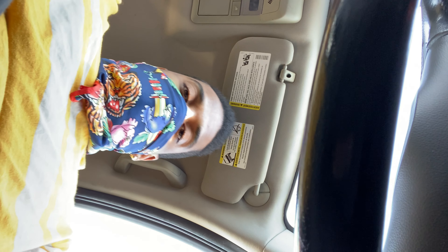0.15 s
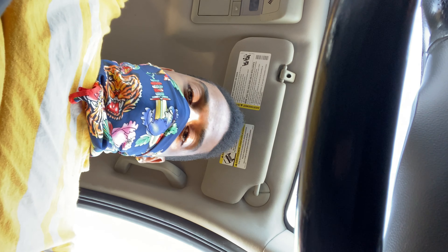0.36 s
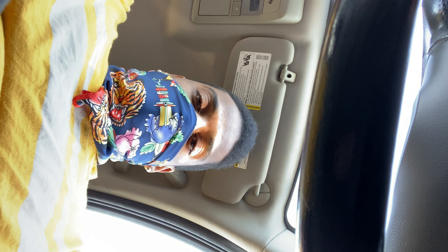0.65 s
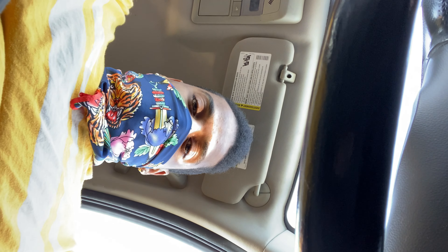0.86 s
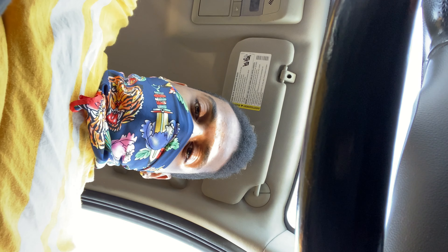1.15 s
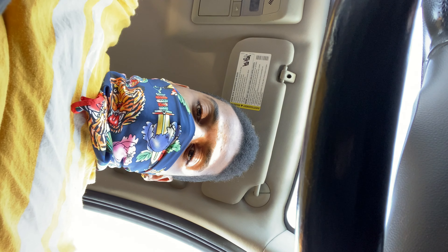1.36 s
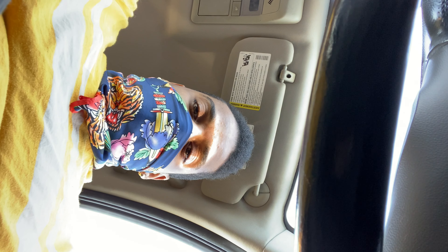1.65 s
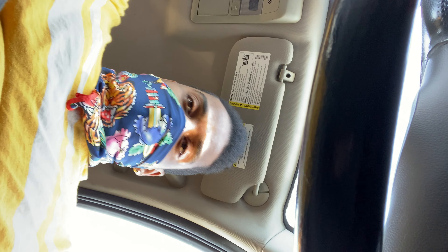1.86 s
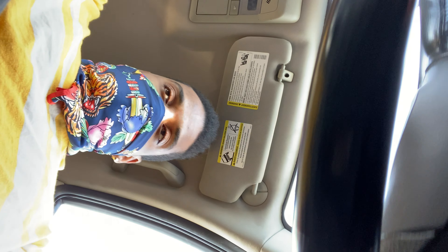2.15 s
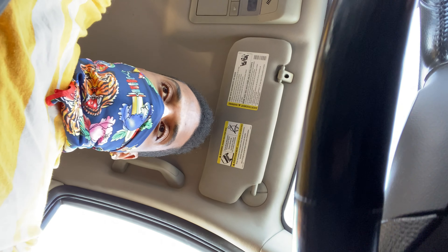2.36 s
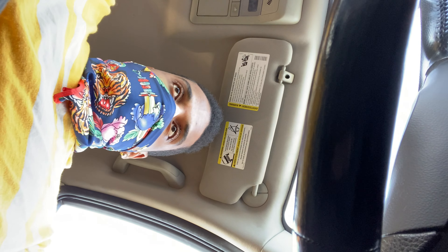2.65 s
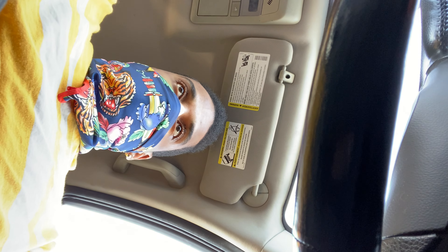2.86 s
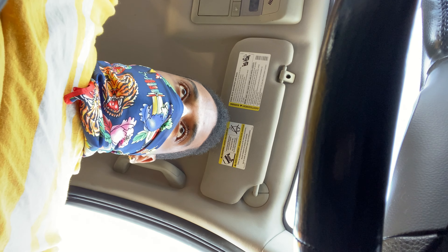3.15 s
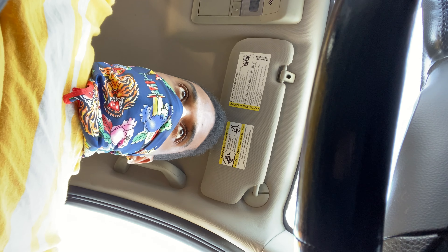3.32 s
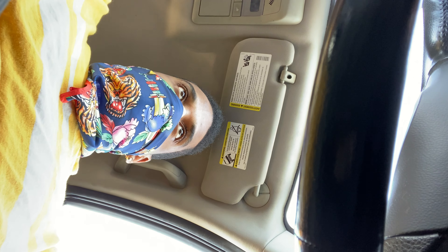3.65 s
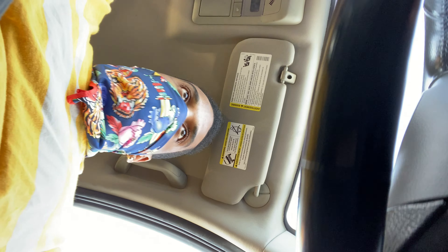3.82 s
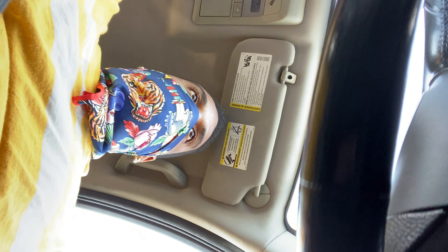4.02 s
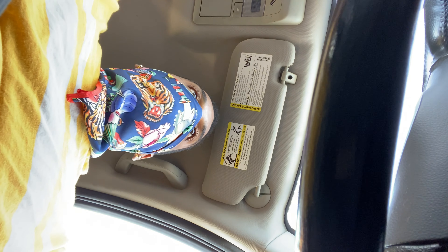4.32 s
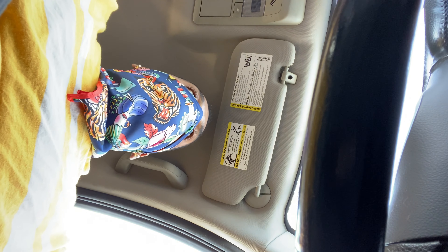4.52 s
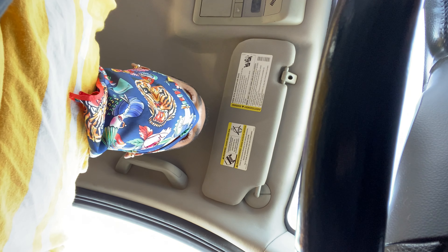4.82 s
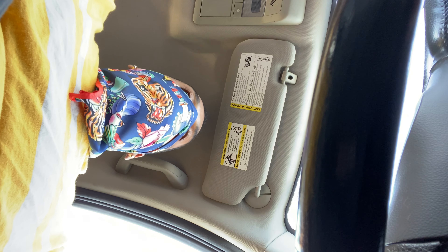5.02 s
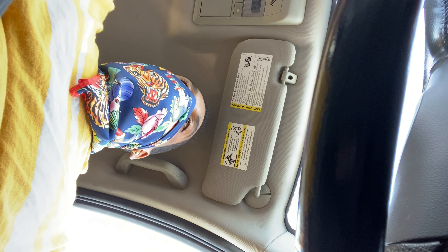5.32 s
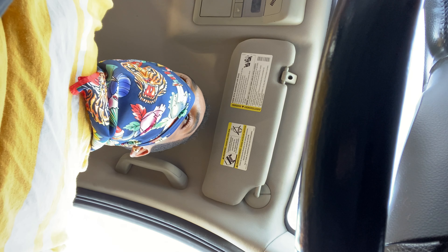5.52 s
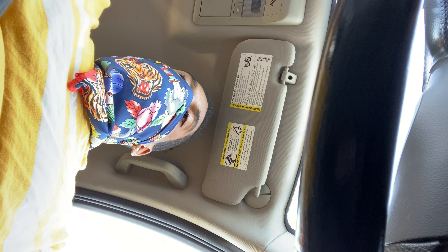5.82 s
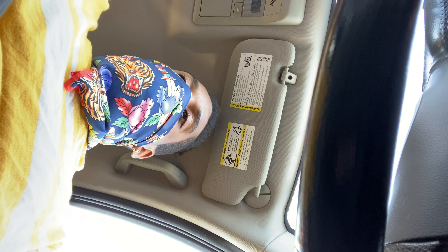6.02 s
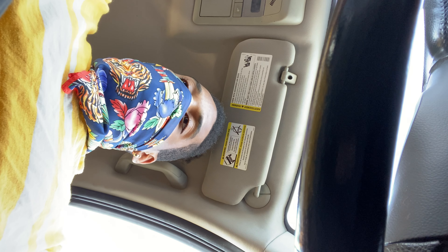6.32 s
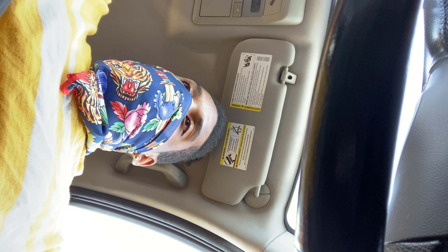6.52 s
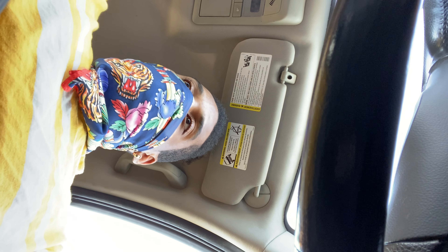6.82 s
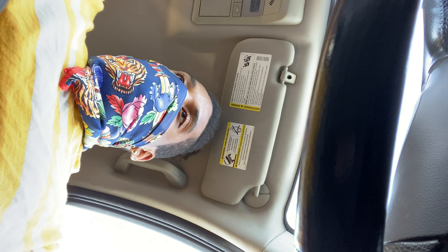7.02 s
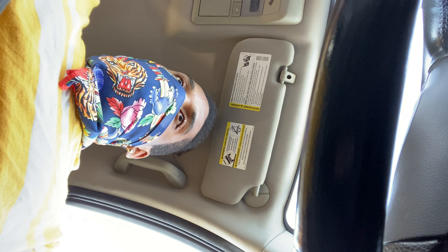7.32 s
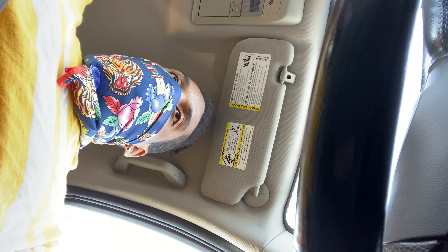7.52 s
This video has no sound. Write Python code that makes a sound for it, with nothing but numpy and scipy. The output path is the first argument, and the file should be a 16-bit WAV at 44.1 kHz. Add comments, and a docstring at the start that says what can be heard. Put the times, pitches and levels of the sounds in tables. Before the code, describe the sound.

Close up in a car cabin, keys clack against each other and the trim, with brief metallic rings, grainy scrapes and occasional dull hand bumps. A few sharp clacks come first, then scattered small clicks and rattles, and finally a louder flurry. Underneath, muffled traffic rumbles steadily outside, along with a faint engine that slows to an idle.

```python
"""Keys scrape and clack as a hand moves them about in a parked car, over a low rumble from outside.
Sliding keys make a grainy hiss. Each knock on other keys or on the car's trim is a burst of tiny
contacts that sets keys and trim ringing briefly. Now and then a loose piece rings on, or the hand
thuds on the trim. Traffic, a slowing engine and two faint hums come through the body of the car.
The cabin adds a short echo, and everything is heard close up, in stereo."""
import sys
import numpy as np
from scipy import signal
from scipy.fft import rfft, irfft, next_fast_len
from scipy.io import wavfile
from scipy.ndimage import map_coordinates

SR = 44100
rng = np.random.default_rng(int(sys.argv[2]) if len(sys.argv) > 2 else 0)


def master_out(mix):
    """Clip the mix to full scale and print it as 16-bit PCM to the path in sys.argv[1]."""
    frames = np.transpose(np.atleast_2d(mix))
    ceiling = np.clip(frames, -1, 1)
    pcm = np.round(ceiling * 32767).astype(np.int16)
    wavfile.write(sys.argv[1], SR, pcm)


N = 338247

# How loudly keys and fingers slide: t/s, key blade level/dB, trim level/dB
SCRAPE_LEVELS = [(0.0, -45, -48.5), (0.2, -44.5, -46), (0.33, -38.5, -45), (0.42, -44, -42),
                 (0.47, -55, -58), (0.56, -58.5, -68.5), (0.77, -66, -53.5), (1.05, -63, -57),
                 (1.43, -65, -59), (1.58, -76.5, -73.5), (1.79, -66.5, -49), (1.9, -62.5, -55.5),
                 (2.76, -69.5, -54.5), (3.14, -59, -59), (3.31, -76.5, -72), (3.57, -86, -64),
                 (3.69, -69.5, -56.5), (4.21, -70.5, -63), (5.0, -80, -62), (5.28, -56.5, -65.5),
                 (5.49, -83, -68), (6.15, -77, -61.5), (6.47, -75, -69), (6.62, -68.5, -50),
                 (6.84, -49.5, -38.5), (6.99, -65.5, -51.5), (7.18, -56.5, -58.5), (7.43, -77, -63.5),
                 (7.67, -85.5, -69.5)]
# Tone colour of the rubbed trim, the steel blades and their thin edges: f/Hz, relative level/dB
TRIM_COLOUR = [(250, -15), (450, 1), (800, -1.5), (1300, -15.5), (2500, -37.5), (5000, -54)]
BLADE_COLOUR = [(600, -41.5), (1250, -3), (1600, -2), (2050, -3), (2600, -2.5), (3300, -5), (6000, -14),
                (9000, -45.5)]
EDGE_COLOUR = [(3000, -45), (6000, -11.5), (9000, 6), (11000, -3), (13000, 1.5), (14500, -9.5),
               (16000, -22)]
# How loud the traffic is: t/s, boom level/dB, drone level/dB
TRAFFIC_LEVELS = [(0.0, -52.5, -43.5), (0.34, -47.5, -46.5), (2.11, -37.5, -46), (2.43, -44, -46),
                  (4.44, -40, -46.5), (5.64, -46, -47.5), (6.49, -46.5, -44.5), (7.37, -37.5, -46.5),
                  (7.67, -41, -51)]
# Tone colour of the deep boom and the higher drone: f/Hz, relative level/dB
BOOM_COLOUR = [(10, -120), (22, -48.5), (30, -14.5), (38, -1.5), (55, 4), (75, -3.5), (100, -7),
               (130, -14.5), (200, -38.5), (400, -120)]
DRONE_COLOUR = [(53, -23.5), (90, -7.5), (114, -13), (136, -14.5), (215, -16.5), (279, -29), (336, -24),
                (565, -37), (613, -59), (1500, -81), (1950, -99), (3300, -120)]
# A faint low hum that swells near the end: t/s, level/dB
LOW_HUM_LEVELS = [(0, -71.5), (5, -63.5), (7.0, -49), (7.3, -45), (7.67, -47)]

# Knocks: t/s, base level/dB, hollowness/dB (on trim rather than steel), brightness/dB (thin edges
# touching), base t60/s, clearest pitch f/Hz. A t60 is the time a sound takes to fade by 60 dB.
KNOCKS = [(0.038, -41, 3.5, -8.5, 0.057, 1635), (0.091, -46.5, 4.5, -8.5, 0.074, 1686),
          (0.151, -53, -13, 0.5, 0.084, 2690), (0.173, -50, 1, 7, 0.084, 1854),
          (0.226, -41, 5.5, -7, 0.065, 2047), (0.271, -45, 6.5, -2.5, 0.1, 1698),
          (0.295, -41, -1, -15, 0.14, 1120), (0.377, -45, 8.5, -10.5, 0.069, 1730),
          (0.426, -47, 11, -10, 0.085, 1080), (0.489, -40, 1.5, -6.5, 0.073, 1066),
          (0.511, -24, -7.5, -14.5, 0.045, 1620), (0.582, -64.5, 3.5, 15, 0.044, 2540),
          (0.606, -63.5, -2.5, 12, 0.074, 1460), (0.627, -66, -3, 10, 0.04, 4500),
          (0.692, -52.5, -4, 4.5, 0.032, 1354), (0.798, -51, -7.5, 4, 0.091, 4130),
          (0.841, -64.5, 0, 5, 0.04, 4000), (0.863, -55.5, 13.5, -3.5, 0.095, 1880),
          (0.905, -66, 20.5, 11.5, 0.037, 1317), (0.944, -66, 6, -27, 0.06, 1260),
          (0.964, -61, 2.5, -21, 0.06, 1690), (0.99, -59, 22, -9.5, 0.047, 1265),
          (1.055, -54, 13.5, -5, 0.088, 1910), (1.078, -34.5, -2, -8.5, 0.066, 1662),
          (1.113, -62, 0, 6.5, 0.03, 3000), (1.124, -60.5, 4.5, 7, 0.06, 950),
          (1.148, -59, 8, -10, 0.053, 1585), (1.194, -48.5, -0.5, 0, 0.04, 1483),
          (1.198, -34, 6.5, 6.5, 0.053, 1024), (1.272, -60, -2, 5.5, 0.06, 1610),
          (1.294, -60.5, 0.5, 8.5, 0.051, 940), (1.334, -64.5, -7, 7.5, 0.035, 2950),
          (1.383, -65, 16.5, -12, 0.067, 2040), (1.447, -57, 8, 3, 0.06, 5340),
          (1.466, -56.5, -2.5, 12, 0.05, 1470), (1.488, -54, 4.5, 2, 0.078, 1514),
          (1.508, -30.5, 1, 8.5, 0.057, 3570), (1.544, -51, -8.5, 10.5, 0.06, 1494),
          (1.603, -61, 3.5, 9, 0.045, 2760), (1.796, -44, 14.5, -27.5, 0.052, 1084),
          (1.818, -50.5, -3, 0, 0.079, 5330), (1.843, -40, 1, -10, 0.057, 1700),
          (1.848, -22.5, -2, -12, 0.065, 1547), (1.888, -59.5, 3, 6, 0.045, 2300),
          (1.902, -58.5, 2.5, 8, 0.088, 1598), (1.917, -50, -2, -2.5, 0.051, 1330),
          (1.951, -54, 0, 10, 0.068, 1500), (2.045, -63, 17, 2, 0.091, 1135),
          (2.078, -57.5, 0, 1, 0.051, 1333), (2.096, -33, -12, -10, 0.032, 2367),
          (2.171, -74.5, 5, 3, 0.048, 1140), (2.213, -65.5, 0, 4.5, 0.054, 2500),
          (2.267, -62.5, 12, -17, 0.055, 1970), (2.287, -39.5, 8.5, -22.5, 0.046, 1659),
          (2.386, -59, 19.5, -11.5, 0.06, 993), (2.441, -60, 4, -8, 0.13, 1680),
          (2.468, -62, 11.5, -6, 0.061, 1100), (2.651, -58.5, -4, 0, 0.067, 1602),
          (2.679, -66, 12.5, -7, 0.23, 1760), (2.711, -59.5, 10.5, -14.5, 0.14, 1610),
          (2.739, -47, 5.5, -3.5, 0.062, 1178), (2.772, -68.5, 11, -24, 0.06, 1296),
          (2.813, -65, 4.5, -3, 0.06, 1850), (2.864, -55.5, -2, -7, 0.05, 1482),
          (2.899, -55, -4.5, -8.5, 0.059, 1222), (2.925, -57, 9, -9, 0.098, 1886),
          (2.987, -43, -5.5, -23, 0.047, 2100), (3.001, -46, 4, -7, 0.046, 3850),
          (3.012, -45.5, 2, -2, 0.067, 2300), (3.022, -35, 2.5, -10, 0.056, 874),
          (3.055, -65.5, 10, 7, 0.051, 1547), (3.077, -54.5, 5, -0.5, 0.03, 1900),
          (3.081, -47.5, 1, 8, 0.048, 2775), (3.104, -50.5, -9.5, -7, 0.049, 2440),
          (3.109, -49.5, -9.5, -10, 0.024, 2005), (3.116, -38, -5.5, -18, 0.04, 2500),
          (3.126, -39.5, 6.5, -20, 0.045, 1400), (3.135, -37, 2, -29, 0.036, 2130),
          (3.156, -47.5, -13, 8.5, 0.06, 2600), (3.164, -38.5, -16.5, 3.5, 0.058, 2440),
          (3.174, -39, -10, 2, 0.036, 2200), (3.18, -45, 7.5, -3.5, 0.04, 1514),
          (3.184, -36.5, -0.5, -6, 0.04, 1928), (3.195, -50, -6, 9, 0.05, 1243),
          (3.205, -45.5, -1, 2.5, 0.04, 2100), (3.225, -38, 4, -17.5, 0.04, 1850),
          (3.237, -38.5, 0.5, 6, 0.04, 1049), (3.239, -34.5, 1.5, -13.5, 0.033, 1954),
          (3.247, -49.5, -9.5, 6, 0.037, 6600), (3.277, -63, -6, 6.5, 0.066, 6350),
          (3.306, -54, -1.5, -10.5, 0.06, 2280), (3.49, -75, 6, 0.5, 0.068, 1910),
          (3.543, -64, 17.5, -18, 0.049, 901), (3.555, -50, 6, -12, 0.11, 2633),
          (3.584, -56.5, 2, 0.5, 0.13, 3415), (3.613, -59.5, 8, 6.5, 0.066, 1162),
          (3.629, -34, 0.5, -30.5, 0.031, 1702), (3.646, -54.5, 0.5, 5.5, 0.14, 3330),
          (3.698, -61.5, 13, -13, 0.055, 1036), (3.72, -56, 2, -12, 0.036, 1457),
          (3.772, -61.5, 16, -4.5, 0.08, 1007), (3.929, -47, 1.5, -6, 0.053, 2167),
          (3.946, -45, -23, 0, 0.043, 3606), (3.975, -52, -14.5, -1.5, 0.044, 2200),
          (3.999, -55.5, -9, 11, 0.034, 1700), (4.007, -52, -10, 4, 0.04, 4510),
          (4.037, -57.5, 0, -12, 0.035, 1996), (4.047, -35.5, 3.5, -17.5, 0.024, 1841),
          (4.06, -55.5, 7.5, -27, 0.026, 1600), (4.178, -41.5, -16.5, -2.5, 0.041, 4304),
          (4.206, -50.5, -3, -20, 0.04, 2500), (4.217, -36, -9.5, -21.5, 0.04, 2323),
          (4.224, -46, -4.5, -21, 0.07, 1940), (4.246, -55, -4, -4, 0.04, 2570),
          (4.278, -57, -6, 6, 0.03, 5140), (4.283, -62, -4, 10, 0.06, 4350),
          (4.302, -47.5, -8.5, 9.5, 0.038, 1460), (4.35, -63.5, -1.5, -12, 0.06, 3920),
          (4.383, -66.5, 19, 7.5, 0.09, 4500), (4.485, -55, 15.5, -24.5, 0.046, 955),
          (4.501, -57, 5.5, -9.5, 0.06, 1900), (4.507, -53, 10.5, -8.5, 0.07, 2084),
          (4.52, -55, 11.5, -11, 0.054, 916), (4.533, -56.5, 1, 5, 0.04, 3990),
          (4.555, -57, -4, 12, 0.03, 4070), (4.562, -57, -7, 1, 0.048, 3970),
          (4.581, -53.5, -3, -1, 0.03, 2400), (4.589, -41, -14.5, 7.5, 0.021, 5200),
          (4.596, -46.5, -14.5, 7, 0.06, 4800), (4.629, -62, -2, 0, 0.06, 3730),
          (4.701, -58, 19.5, -14, 0.037, 904), (4.708, -60, 3, -4.5, 0.12, 3360),
          (4.803, -68.5, 8.5, -4, 0.06, 970), (4.905, -61, 9, -15, 0.06, 1913),
          (5.018, -74.5, 11, -14, 0.041, 1920), (5.075, -76, 20.5, -12, 0.07, 895),
          (5.097, -43.5, 0.5, -7, 0.077, 1705), (5.178, -37.5, -6, -10.5, 0.04, 2444),
          (5.189, -48, 4, -8, 0.05, 1554), (5.224, -49.5, -5, 9, 0.039, 4024),
          (5.246, -60.5, -4, -20.5, 0.04, 2007), (5.258, -37.5, -10, 4.5, 0.04, 5420),
          (5.273, -52, -13.5, 14, 0.03, 12720), (5.279, -50, -10, 12.5, 0.03, 1930),
          (5.283, -37, -13, 15.5, 0.025, 5220), (5.336, -45.5, -13.5, 4, 0.045, 2530),
          (5.35, -51.5, -12, 8.5, 0.025, 2160), (5.36, -46.5, 14.5, -23, 0.037, 709),
          (5.372, -62.5, 9, 9, 0.072, 1075), (5.479, -52.5, -17, 7.5, 0.06, 3995),
          (5.689, -57.5, 18.5, -10.5, 0.14, 2685), (5.726, -54, 1.5, -0.5, 0.077, 1516),
          (5.749, -36.5, 1.5, 7, 0.03, 1060), (5.764, -51, 9.5, 1, 0.04, 2540),
          (5.778, -46, 11, 4.5, 0.034, 934), (5.789, -55.5, 15.5, -13.5, 0.079, 1372),
          (5.839, -73.5, 20, 11, 0.045, 3700), (6.027, -68, 1.5, -17, 0.082, 1600),
          (6.08, -77.5, 13.5, -1, 0.055, 2920), (6.178, -49.5, 14.5, -13.5, 0.063, 1123),
          (6.235, -67.5, -0.5, 11, 0.06, 1720), (6.259, -72, 3, 13.5, 0.068, 4000),
          (6.343, -56.5, -2.5, 0, 0.046, 4080), (6.37, -67.5, 1.5, 5, 0.067, 4200),
          (6.42, -56, 19.5, -31, 0.034, 895), (6.437, -61, 7, -10, 0.078, 1136),
          (6.443, -49.5, 4.5, -9.5, 0.1, 2200), (6.468, -56.5, 6, 3, 0.044, 2600),
          (6.476, -45, 4.5, 7.5, 0.032, 5220), (6.489, -45, 5.5, 5.5, 0.08, 5360),
          (6.519, -56.5, 13, -17.5, 0.036, 1109), (6.529, -49.5, 11, 4, 0.065, 1032),
          (6.579, -49.5, 21, -14, 0.021, 889), (6.613, -75, 12.5, -12, 0.037, 1524),
          (6.635, -43.5, 14, -7.5, 0.032, 737), (6.656, -60, 11.5, -9.5, 0.04, 810),
          (6.668, -55, 6.5, 0.5, 0.07, 1283), (6.678, -49.5, 15.5, 3.5, 0.04, 750),
          (6.691, -39, 4, 5, 0.059, 1735), (6.718, -60.5, 20.5, -16, 0.06, 499),
          (6.752, -41, 2, -14.5, 0.06, 1904), (6.763, -44, 1.5, -15, 0.054, 1920),
          (6.776, -39.5, 1.5, -4, 0.05, 2294), (6.804, -42.5, 1, -14, 0.06, 1670),
          (6.815, -28.5, -6.5, 7, 0.063, 7230), (6.824, -33, 1.5, -10.5, 0.05, 1717),
          (6.849, -40, 4.5, -25.5, 0.064, 1825), (6.86, -45, 2, -23.5, 0.046, 2124),
          (6.89, -35, 0, -8.5, 0.054, 3307), (6.917, -55, 7, -25, 0.093, 1520),
          (6.941, -49, 5, -28, 0.05, 1828), (6.951, -50, 4.5, -28, 0.038, 1904),
          (6.961, -45.5, 4.5, -26, 0.04, 2190), (6.976, -43, 5.5, -24, 0.06, 1274),
          (6.993, -39, 3, -15, 0.05, 1588), (6.998, -24, 2, -11.5, 0.054, 2090),
          (7.066, -49.5, 8.5, -35.5, 0.03, 1614), (7.109, -60, -12, -5, 0.04, 5080),
          (7.122, -36, 4.5, -26, 0.031, 901), (7.137, -45.5, -3, 0, 0.051, 3345),
          (7.153, -41, -2.5, -10, 0.054, 1860), (7.169, -59, 7, 9, 0.094, 1574),
          (7.19, -48.5, -1.5, 5, 0.097, 3160), (7.205, -39.5, 4, 3.5, 0.098, 1004),
          (7.235, -49, -1, 10, 0.04, 5300), (7.262, -60, -1.5, -21, 0.05, 1900),
          (7.273, -40.5, 4, -1, 0.12, 1793), (7.285, -23, -7, 1, 0.045, 1776),
          (7.288, -16.5, -12.5, -3.5, 0.048, 3153), (7.333, -41, 3.5, 4, 0.066, 1380),
          (7.493, -70.5, 2.5, 7, 0.052, 4120)]
# A knock has six bands (ranges of pitch): clack, thud, knock, snap, chink, fizz. One value for each:
BAND_CENTRES = [3400, 170, 740, 1750, 6800, 13000]  # middle of the band: f/Hz
BAND_LEVELS = [2.5, -6.5, 1.5, 1, 3.5, 6]  # how strongly it sounds: added level/dB
BAND_STRETCH = [0.94, 2.57, 1.73, 1.356, 0.99, 0.67]  # factor on the base rise time and base t60
BAND_HOLLOW = [0.058, 0.55, 1, 0.25, 0.047, 0.061]  # share of the hollowness it takes
BAND_BRIGHT = [0.19, 0.3, -0.1, -0.2, 0.5, 1]  # share of the brightness it takes
# Short ringing tones of the struck trim (low) and the keys (higher): f/Hz, relative level/dB
STRUCK_TONES = [(490, 6.5), (720, 0.5), (1130, 2.5), (1600, -2.5), (2070, -2.5), (2630, 4), (3400, -8),
                (4150, 2), (4980, 3.5), (5370, 0.5), (7130, -16.5), (7900, -28), (10300, -17), (11600, -9),
                (12900, -11.5)]
# Moments when a piece of metal hangs free and rings on: t/s, f/Hz, level/dB, t60/s
FREE_RINGS = [(0.513, 1932, -15, 0.027), (1.508, 3390, -28, 0.11), (1.507, 6650, -20, 0.042),
              (1.517, 1583, -27, 0.098), (1.852, 1647, -23, 0.099), (2.289, 1860, -21, 0.026),
              (3.03, 1560, -36.5, .1), (7.0, 850, -26, 0.06), (7.214, 1500, -36, 0.05),
              (7.212, 750, -36, 0.08), (6.999, 2062, -24, 0.072), (7.006, 1552, -23.5, 0.11),
              (7.285, 1097, -14, 0.09), (7.3, 890, -42, 0.45), (7.318, 1610, -45, 0.35),
              (7.299, 2920, -53, 0.35), (7.336, 4080, -37, 0.04)]
# The hand bumps the trim: t/s, level/dB
HAND_BUMPS = [(0.514, -25), (1.076, -24), (1.195, -34.5), (1.846, -22.5), (2.289, -26), (3.018, -28.5),
              (3.125, -34), (3.772, -28.5), (5.175, -33), (6.524, -33), (6.691, -21.5), (6.752, -32),
              (6.813, -35), (7.287, -23.5), (7.333, -28)]

# How long sound lingers in the cabin: f/Hz, t60/s
CABIN_DECAY = [(200, 0.79), (1500, 0.067), (5000, 0.045), (13000, 0.027)]
# Phase of the left channel against the right: f/Hz, phase/rad
# Above 6.5 kHz a steady ramp colours the stereo treble.
LEFT_PHASE = [(0, 0), (200, -.7), (500, -1.6), (800, -1.9), (1150, -2.15), (1500, -4.2), (2000, -5.5),
              (3000, -8.4), (5000, -14.3), (5600, -15.1), (6000, -15), (6500, -14.2), (15500, -3.14),
              (18000, 0)]
# How much louder the left channel is than the right: f/Hz, level/dB
LEFT_TILT = [(60, 1.2), (350, 2.5), (750, -2.5), (1050, -1), (1500, 4.5), (2200, 2.5), (3200, -3),
             (4000, -1), (6000, -4), (7500, 0)]
# The smeared part that differs between left and right, giving stereo width: f/Hz, relative level/dB
WIDTH_LEVELS = [(60, -20), (300, -11), (1000, -11), (1500, -7), (2500, -4), (6000, -5), (7800, -19),
                (15000, -17)]


def amp(db):
    """Turn decibels into a factor to multiply by."""
    return 10 ** (np.asarray(db) / 20)


def unit(x):
    """Scale x to an average strength (rms) of 1."""
    return x / np.sqrt(np.mean(x ** 2) + 1e-20)


def along(points, hz):
    """Read between (f/Hz, value) points on a logarithmic frequency scale."""
    f, values = np.transpose(points)
    return np.interp(np.log(hz + 1), np.log(f + 1), values)


def curves(rows):
    """Turn each column after the time into one value per sample."""
    times, *columns = np.transpose(rows)
    return [np.interp(np.arange(N) / SR, times, column) for column in columns]


def wobble(rate):
    """A smooth curve through `rate` random values a second."""
    return map_coordinates(rng.standard_normal(int(N * rate / SR) + 4), [np.arange(N) * rate / SR])


def filtered(x, response):
    """Change the strength and phase of each frequency in x by response(hz)."""
    size = next_fast_len(N + SR // 2)
    return irfft(rfft(x, size) * response(np.fft.rfftfreq(size, 1 / SR)), size)[..., :N]


def noise(colour, grain_db, grain_rate):
    """Noise of strength 1 with the given tone colour; its level flickers, so it sounds grainy."""
    grains = amp(grain_db * wobble(grain_rate)) * rng.standard_normal(N)
    return unit(filtered(grains, lambda hz: amp(along(colour, hz))))


def tone(hz, waver_hz):
    """A pure tone of strength 1 whose pitch wanders a little."""
    return np.sqrt(2) * np.sin(2 * np.pi * np.cumsum(hz + waver_hz * wobble(6.1)) / SR)


def scatter(x, decays=None):
    """Smear x with random phases; given (f/Hz, t60/s) points, each frequency also lingers."""
    hz, t, spectrum = signal.stft(x, SR, nperseg=256)
    power = np.abs(spectrum) ** 2
    if decays:
        linger = amp(-60 * t[:64] / along(decays, hz)[:, None]) ** 2
        linger /= linger.sum(axis=1, keepdims=True)
        power = np.abs(signal.fftconvolve(power, linger, axes=1))[:, :len(t)]
    phases = np.exp(2j * np.pi * rng.random(spectrum.shape))
    smeared = signal.istft(np.sqrt(power) * phases, SR, nperseg=256)[1][:N]
    return unit(smeared) * np.std(x)


def scrape(edge_offset_db=-6.5):
    """Sliding makes grainy noise in the trim, the key blades and their edges, all catching together."""
    blade_db, trim_db = curves(SCRAPE_LEVELS)
    catch = np.minimum(wobble(70) ** 2, 4) - 1  # mostly smooth, with sudden short catches
    trim = amp(trim_db + catch) * noise(TRIM_COLOUR, grain_db=-2.5, grain_rate=50)
    blades = amp(blade_db + 0.5 * catch) * noise(BLADE_COLOUR, grain_db=2.5, grain_rate=250)
    edge_db = blade_db + edge_offset_db + 3.6 * catch + 2.2 * wobble(12)
    edges = amp(edge_db) * noise(EDGE_COLOUR, grain_db=1.5, grain_rate=670)
    return trim + blades + edges


def traffic():
    """Traffic comes through the body of the car as a deep boom and a drone."""
    boom_db, drone_db = curves(TRAFFIC_LEVELS)
    boom = amp(boom_db) * noise(BOOM_COLOUR, grain_db=3.5, grain_rate=8)
    drone = amp(drone_db) * noise(DRONE_COLOUR, grain_db=2.0, grain_rate=14)
    return boom + drone


def hums():
    """Two faint hums: the low one swells late, the high one stays at one level."""
    low_db, = curves(LOW_HUM_LEVELS)
    low = amp(low_db + 1.5 * wobble(15)) * tone(hz=103, waver_hz=3.0)
    high = amp(-62) * tone(hz=272, waver_hz=1.5)
    return low + high


def engine(run_hz=56, idle_hz=33.5, slows_at_s=2.8, settle_s=1.1, fades_at_s=5.1):
    """The firing of a nearby engine makes a low tone that sinks as it slows to idle, then gets softer."""
    t = np.arange(N) / SR
    firing_hz = idle_hz + (run_hz - idle_hz) * np.exp(-np.maximum(t - slows_at_s, 0) / settle_s)
    level_db = np.interp(t, [fades_at_s, N / SR], [-48.5, -54])
    return amp(level_db + 2.5 * wobble(5.3)) * tone(firing_hz, waver_hz=0.65)


def knocks(base_rise_s=0.0011, base_first_s=0.00084):
    """Each knock is a quick pile-up of tiny contacts: noise in six bands, plus short ringing tones."""
    t = np.arange(SR // 8) / SR
    stretch = np.array(BAND_STRETCH)[:, None]
    swell = 1 - np.exp(-(t / (base_rise_s * stretch)) ** 2)
    first_contact = 1 + 0.34 * np.exp(-t / (base_first_s * stretch))  # the first is the hardest
    loudness, ringing = np.zeros((len(BAND_CENTRES), N + SR)), np.zeros(N + SR)
    for start_s, level, hollow, bright, t60, clear_hz in KNOCKS:
        at = round(start_s * SR)
        colour_db = hollow * np.array(BAND_HOLLOW) + bright * np.array(BAND_BRIGHT)
        band_db = level + colour_db + BAND_LEVELS
        fade = amp(band_db[:, None] - 60 * t / (t60 * stretch))
        loudness[:, at:at + len(t)] += fade * swell * first_contact
        ring = struck_ring(band_db, clear_hz, clear_t60=0.7 * t60)
        ringing[at:at + len(ring)] += ring * swell[0, :len(ring)]  # rises with the clack band
    loudness[1] += hand_thuds()  # band 1 is the thud
    contacts = unit(amp(3 * wobble(1500)) * rng.standard_normal(N))
    return ringing[:N] + filtered(loudness[:, :N] * contacts, band_filters).sum(axis=0)


def band_filters(hz, late_cycles=0.84):
    """Six overlapping filters for a knock. Each keeps white noise as strong; low bands sound later."""
    rows = []
    for own in BAND_CENTRES:
        corners = [(70, 0), (17000, 0)] + [(centre, centre == own) for centre in BAND_CENTRES]
        rows.append(along(sorted(corners), hz))
    gains = np.array(rows)
    delay = np.exp(-2j * np.pi * hz * late_cycles / np.array(BAND_CENTRES)[:, None])
    return delay * gains / np.sqrt(np.mean(gains ** 2, axis=1, keepdims=True))


def struck_ring(band_db, clear_hz, clear_t60, ring_db=-6, uneven_db=4, detune=0.029, stand_out_db=2):
    """Struck trim (low) and keys (higher) ring briefly; the piece hit most squarely adds a clear pitch."""
    t = np.arange(SR // 20) / SR
    tone_hz, tone_db = np.array(STRUCK_TONES).T[..., None]
    t60 = 0.05 * (1000 / tone_hz) ** 0.35  # high tones die first
    strength, bend, phase = rng.standard_normal((3, len(STRUCK_TONES), 1))
    strike = sorted(zip(BAND_CENTRES, band_db))  # a tone rings as hard as its band is struck
    level_db = along(strike, tone_hz) + tone_db + ring_db + uneven_db * strength
    pitch_hz = tone_hz * (1 + detune * bend)  # each knock rings at slightly different pitches
    tones = amp(level_db - 60 * t / t60) * np.sin(2 * np.pi * (pitch_hz * t + phase))
    clear_db = along(strike, clear_hz) + stand_out_db
    clear = amp(clear_db - 60 * t / clear_t60) * np.sin(2 * np.pi * clear_hz * t)
    return tones.sum(axis=0) + clear


def free_rings(rise_s=0.00019):
    """A piece of metal that hangs free dies away on one clear pitch."""
    out, t = np.zeros(N + SR), np.arange(SR // 3) / SR
    swell = 1 - np.exp(-t / rise_s)
    for start_s, hz, db, t60 in FREE_RINGS:
        out[round(start_s * SR):][:len(t)] += amp(db - 60 * t / t60) * swell * np.sin(2 * np.pi * hz * t)
    return out[:N]


def hand_thuds(rise_s=0.0064, t60=0.14):
    """The hand bumps the trim: a loudness curve for the low noise, rising softly and fading each time."""
    loudness, t = np.zeros(N + SR), np.arange(SR // 8) / SR
    swell = 1 - np.exp(-(t / rise_s) ** 2)
    for start_s, db in HAND_BUMPS:
        loudness[round(start_s * SR):][:len(t)] += amp(db - 60 * t / t60) * swell
    return loudness


def stereo(x):
    """Left and right get x with different phase and level; a smeared part of opposite sign adds width."""
    def left_and_right(hz):
        """Each side takes half of the difference in level and phase."""
        phase = np.interp(hz, *np.transpose(LEFT_PHASE))
        left = amp(along(LEFT_TILT, hz) / 2) * np.exp(0.5j * phase)
        return np.array([left, 1 / left])
    width = filtered(scatter(x), lambda hz: amp(along(WIDTH_LEVELS, hz)))
    return filtered(np.array([x + width, x - width]), left_and_right)


def scene():
    """The keys, their short echo in the cabin and the sounds from outside, in stereo."""
    keys = knocks() + free_rings() + scrape()
    cabin_echo = amp(-17.5) * scatter(keys, CABIN_DECAY)
    outside = traffic() + hums() + engine()
    return stereo(keys + cabin_echo + outside)


def record(dry):
    """The hardest peaks are rounded off; the top treble fades and ends at 16.3 kHz."""
    ceiling, top_hz = 0.9, 16300
    roll_off = [(14000, 0.5), (15300, 0), (15800, -17), (16300, -31)]  # f/Hz, level/dB
    rounded = dry / (1 + np.abs(dry / ceiling) ** 4) ** 0.25
    return filtered(rounded, lambda hz: amp(along(roll_off, hz)) * (hz < top_hz))


dry = scene()
out = record(dry)
master_out(out)
```